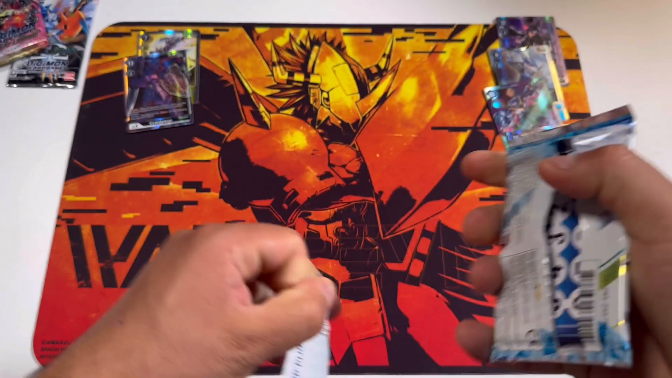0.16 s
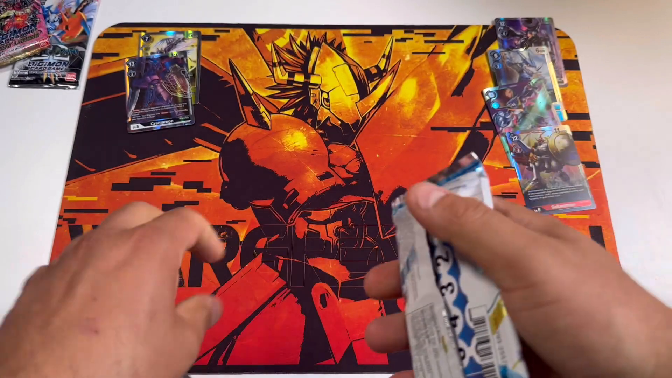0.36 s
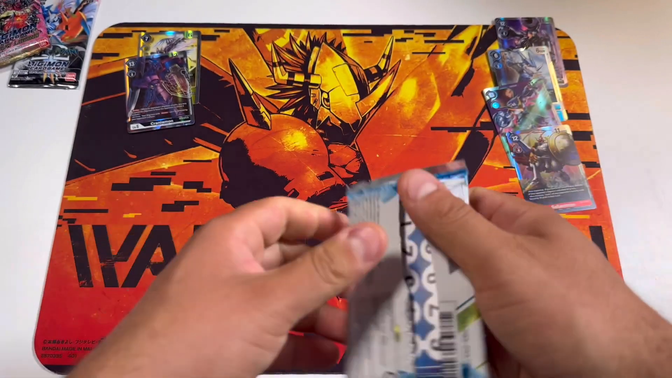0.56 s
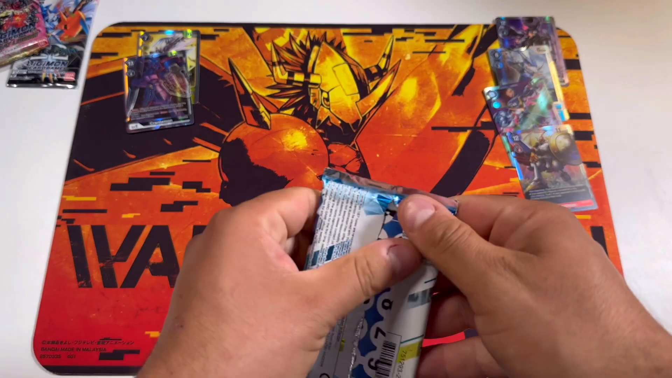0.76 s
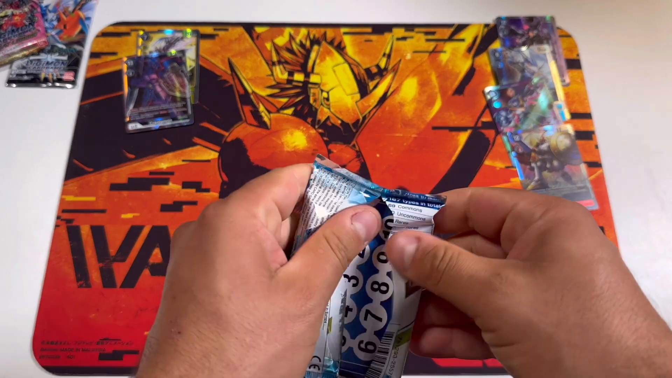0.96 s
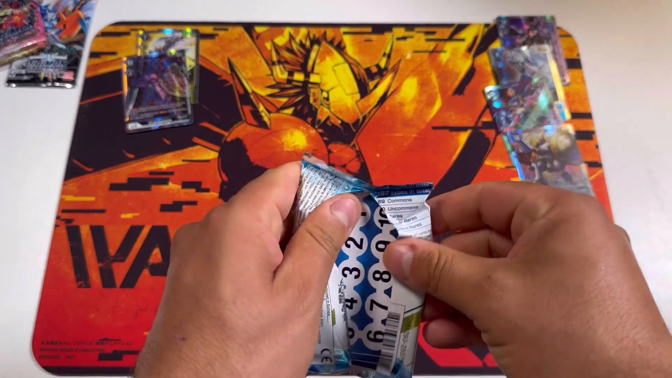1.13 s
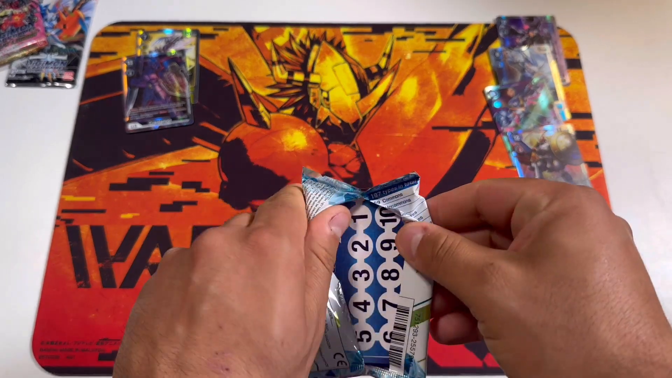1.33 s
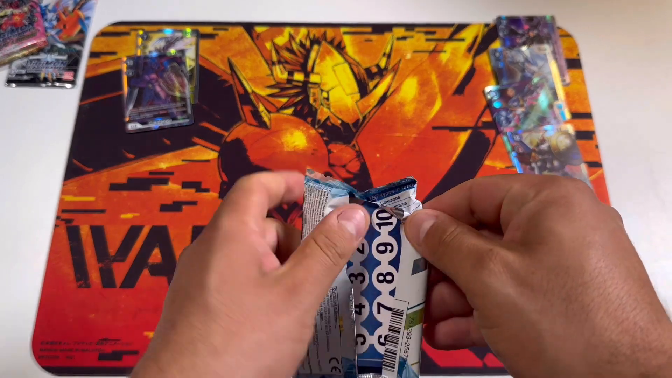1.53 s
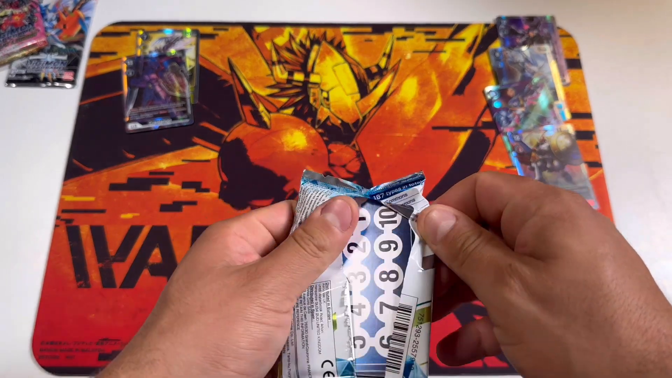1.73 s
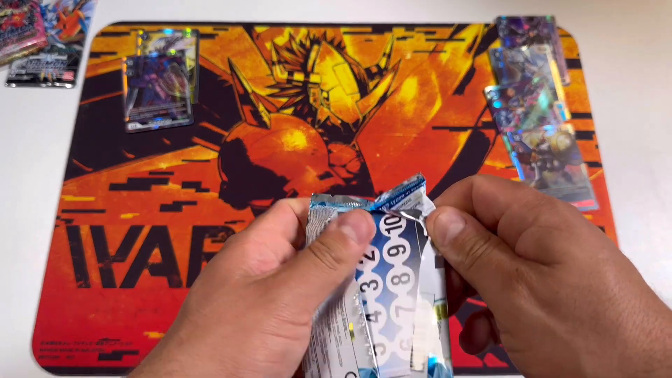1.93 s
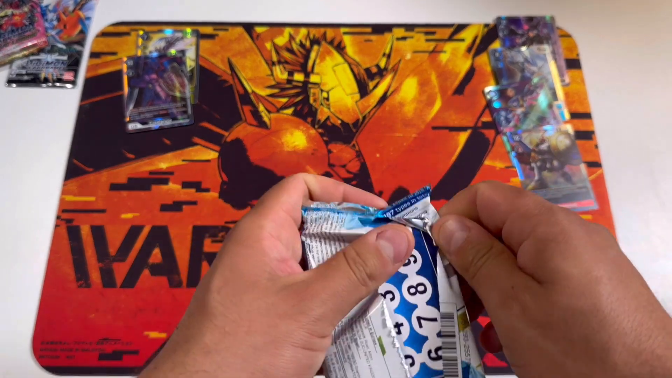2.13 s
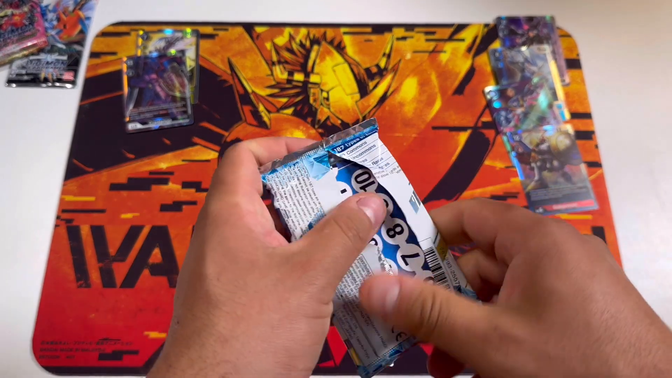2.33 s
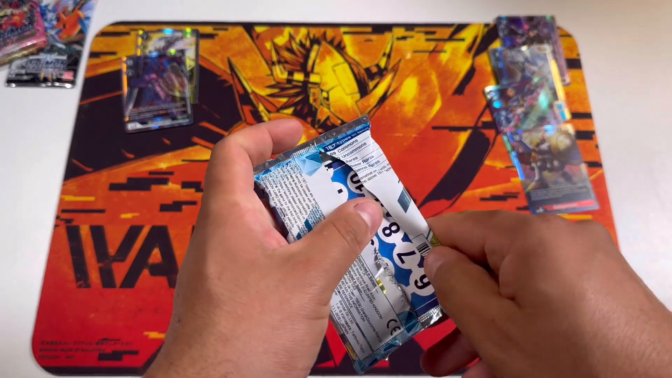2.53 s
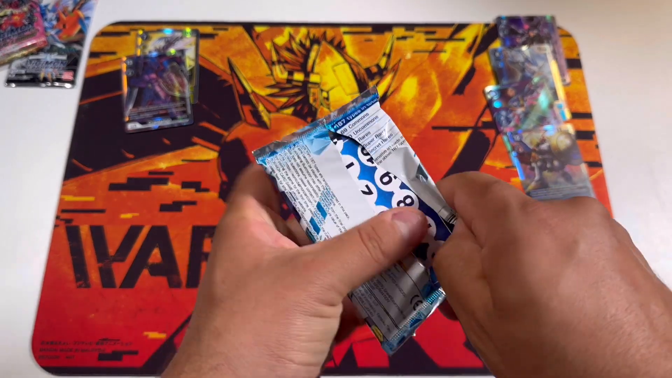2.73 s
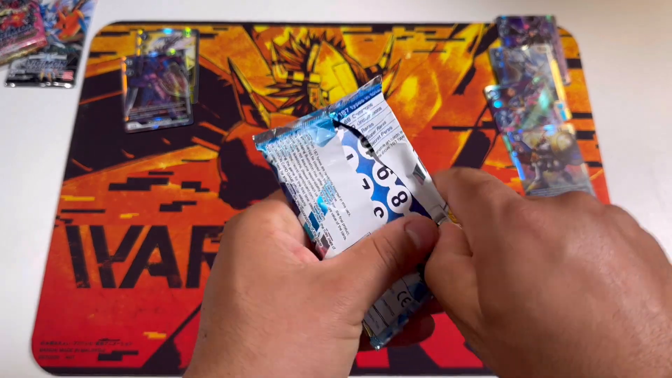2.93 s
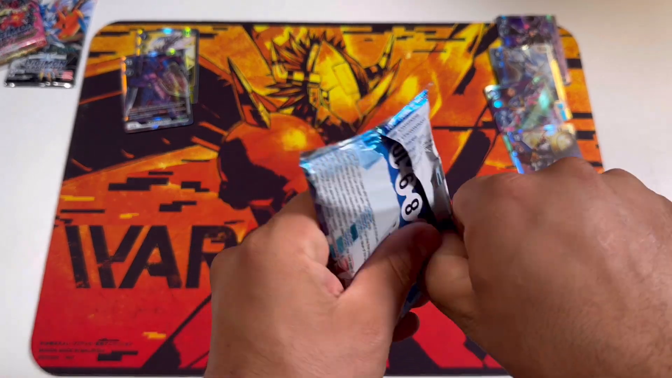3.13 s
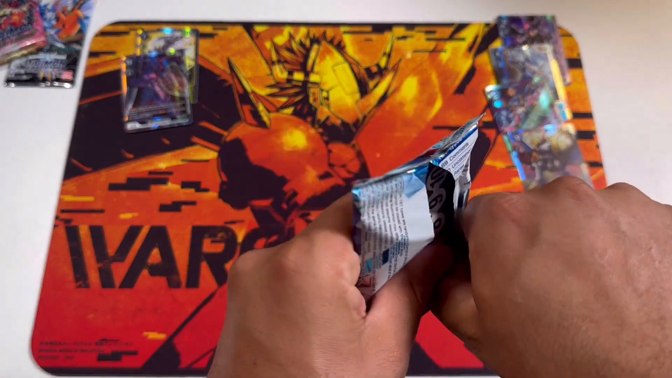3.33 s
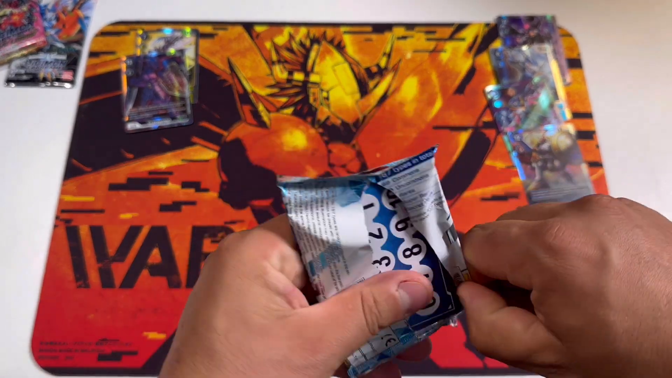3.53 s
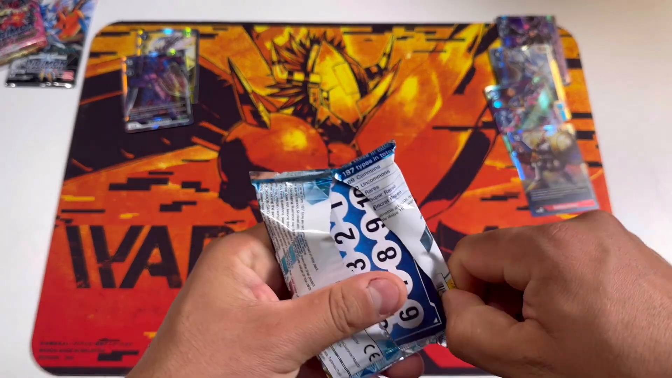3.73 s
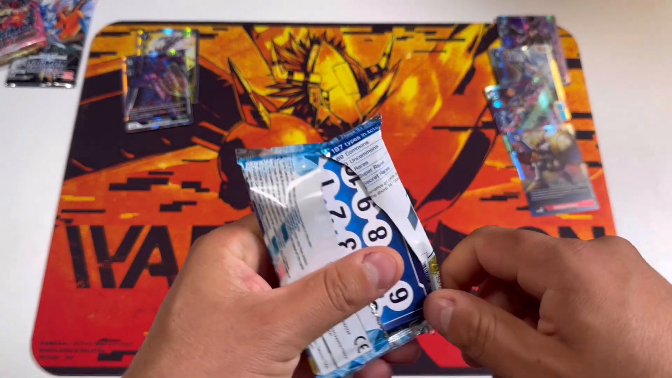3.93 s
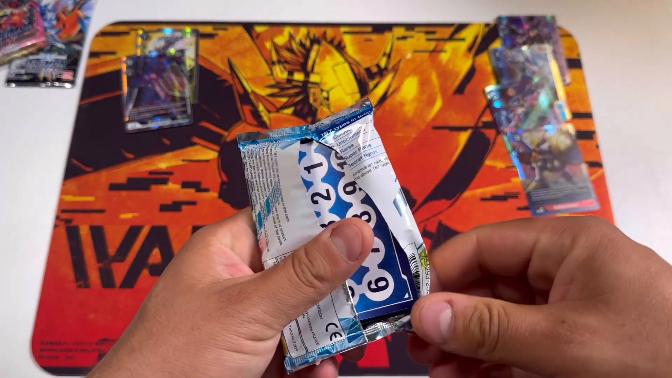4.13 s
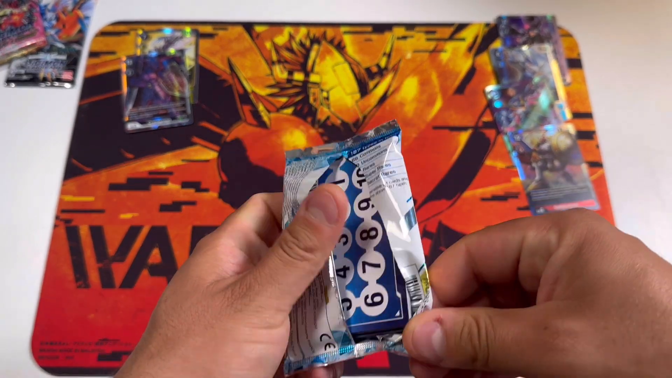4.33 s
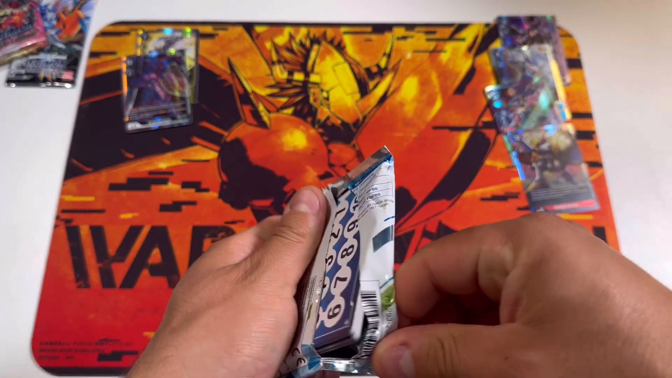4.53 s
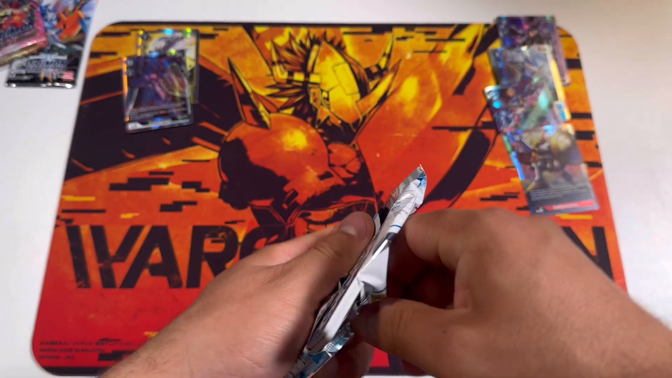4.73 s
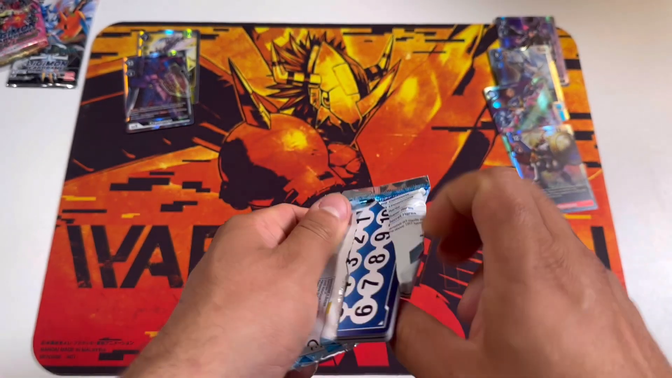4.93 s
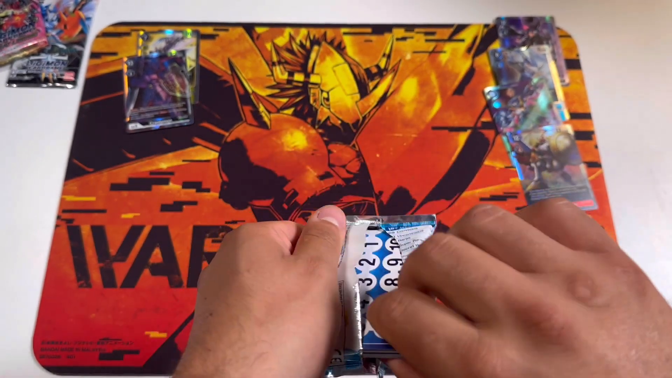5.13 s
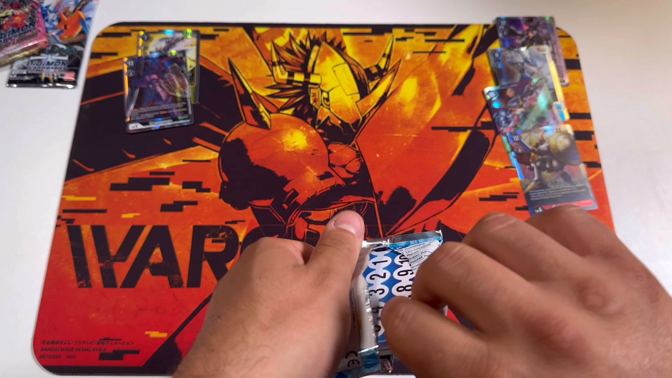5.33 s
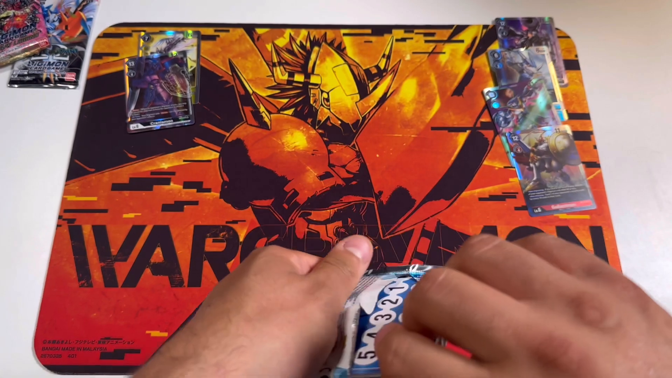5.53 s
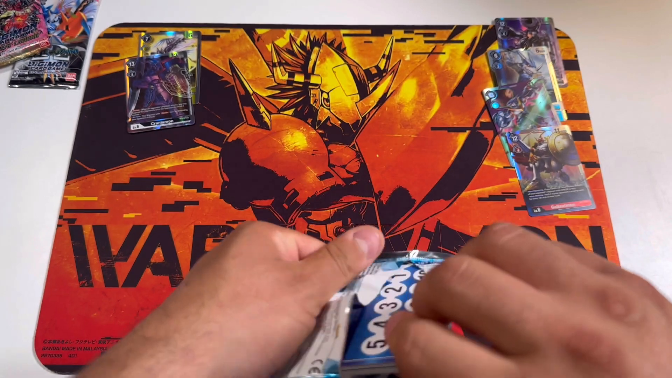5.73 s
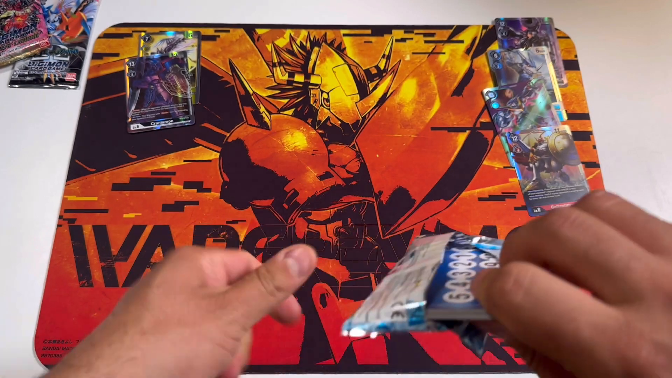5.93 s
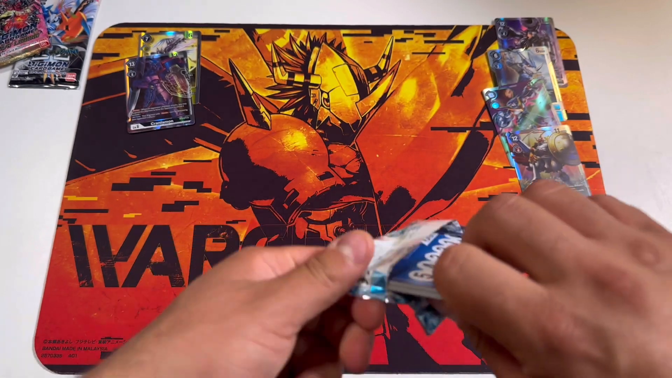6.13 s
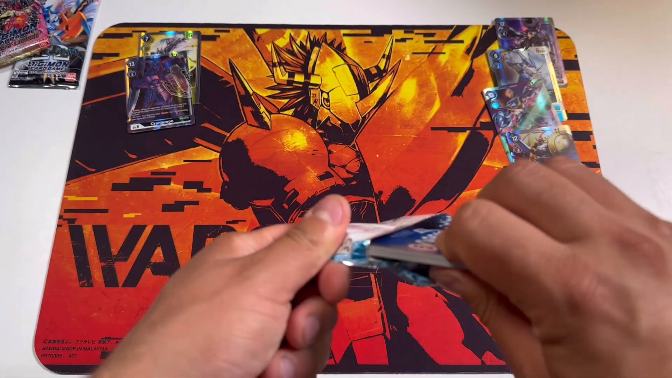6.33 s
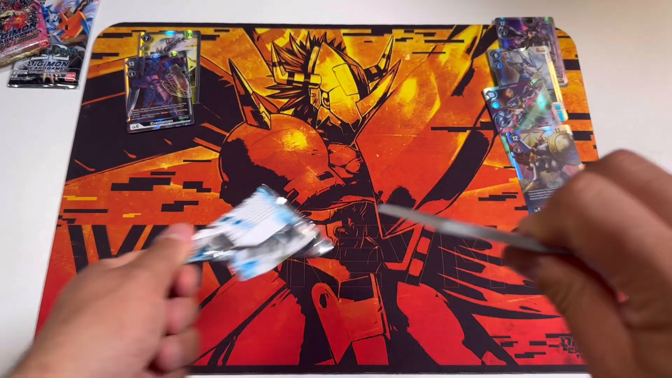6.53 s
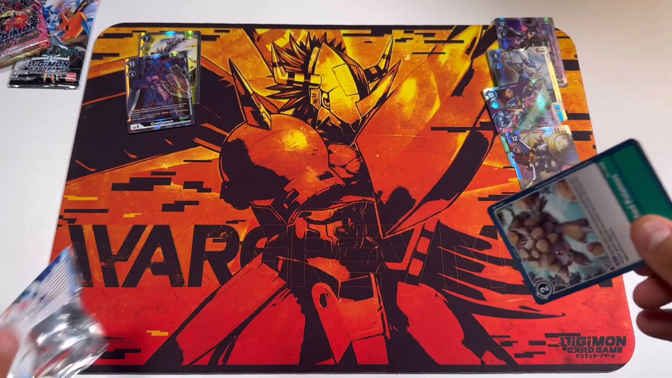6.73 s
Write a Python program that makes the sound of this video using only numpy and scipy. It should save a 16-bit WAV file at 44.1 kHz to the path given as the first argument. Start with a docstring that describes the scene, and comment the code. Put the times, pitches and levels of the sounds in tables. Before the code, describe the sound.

Two hands work a foil card packet very close to a stereo microphone in a small quiet room. Scattered crisp snaps and fine rustling come first, thicken into dense crackles around three and a half and four and a half seconds, then thin out. Short tears follow, and the wrapper is ripped away with a loud, thumping crackle near six and a half seconds, leaving near silence and one last snap.

```python
"""A small room, a two-port microphone close to two hands that open a foil card wrapper.
They crinkle it, rip its seam open and pull it off the cards. Creases snap one by one as chirping clicks;
foil tears or slides in dense runs of tiny crackles, and squeezes stir a fine rustle of wrinkles and foil.
Stretches of wrapper thump and plink as sinking tones; the hands rumble and brush as filtered noise.
Behind them lie the room's short diffuse tail and a bed of still air."""
import sys
import numpy as np
from scipy import signal
from scipy.fft import rfft, irfft
from scipy.io import wavfile
from scipy.ndimage import uniform_filter1d

SR = 44100
rng = np.random.default_rng(int(sys.argv[2]) if len(sys.argv) > 2 else 0)


def dump(signal):
    """Clip the signal to [-1, 1] and save it as 16-bit WAV at the path in sys.argv[1]."""
    limited = np.clip(np.atleast_2d(signal).T, -1, 1)
    pcm = np.round(limited * 32767).astype(np.int16)
    wavfile.write(sys.argv[1], SR, pcm)


N = 302614  # length in samples
TIME = np.arange(N) / SR  # s
TAPS = 1024  # samples in one click
HZ = np.fft.rfftfreq(TAPS, 1 / SR) + 1  # Hz, kept above zero

# Creases snapping close to the microphone:
# [t/s, level/dB, lowest f/Hz the facet radiates, ring f/Hz, brightness/(dB per octave)]
CREASE_SNAPS = [(0.032, -7, 620, 8600, -2), (0.0474, -11, 990, 10000, 4), (0.2324, -10, 260, 2230, 5),
                (0.4168, -10, 352, 1210, -2.5), (0.5631, -20, 330, 2080, -6.5), (0.6765, 3.5, 500, 6430, 1),
                (0.8168, -3.5, 427, 6250, 3.5), (0.8868, 8, 454, 5060, 1.5), (0.968, -8.5, 690, 3280, -0.5),
                (0.9811, -1.5, 714, 12100, -5.5), (1.089, -9.5, 370, 2930, 0.0), (1.1414, 1, 725, 2000, -1),
                (1.1535, -5, 610, 2600, -2.5), (1.204, 1, 890, 4350, -2.5), (1.255, -9.5, 1450, 3980, -8),
                (1.2908, -5.5, 1420, 5650, -3.5), (1.2947, -12, 770, 7800, 8.5), (1.3116, 5, 480, 3400, -3),
                (1.3276, -4, 770, 2360, -1.5), (1.4186, -9.5, 1750, 3240, -3.0),
                (1.4452, -20, 1430, 3300, -8.5), (1.468, -4, 480, 2810, -3.0),
                (1.4855, -10.5, 420, 1520, 1), (1.615, -15.5, 875, 3530, -1.5),
                (1.63, -9.5, 198, 1520, -0.5), (1.638, -6, 1450, 3430, -4.5), (1.7335, -11, 290, 4600, 7.5),
                (1.752, -11, 553, 4600, -2), (1.784, -12.5, 480, 8700, 2.5), (1.8265, -9.5, 423, 1900, 3),
                (1.8763, -7, 1800, 4500, -7), (1.8937, -7.5, 1250, 8600, -5.0),
                (1.9504, -5, 1420, 9500, -3.5), (1.9714, -5, 420, 1500, 1.5), (1.982, -9, 330, 1410, 2),
                (2.06, -14.0, 1420, 4500, -4.5), (2.09, -21.5, 1810, 4500, -7.5),
                (2.1035, -4, 1260, 10700, -2.0), (2.1361, -11.5, 665, 5000, -3),
                (2.2047, -11, 330, 1920, -0.5), (2.262, -17.0, 260, 2920, -2.5),
                (2.2793, -8.5, 1110, 3300, 0.5), (2.343, -10.5, 330, 3230, 1.5),
                (2.3478, -10, 200, 4380, 6.5), (2.5365, -20.5, 1000, 7000, 0.5),
                (2.5579, -8, 610, 5570, 4.5), (2.616, 1.5, 806, 3200, -1.0), (2.6622, -11, 1270, 2900, 0.0),
                (2.685, -10, 750, 3340, 0), (2.8323, -10.5, 1110, 3220, -2), (2.844, -9.5, 257, 3360, 2.5),
                (2.877, 0.5, 555, 2550, -3), (2.8905, -7.5, 370, 2620, 0.5), (2.9338, -1, 710, 2620, 1),
                (2.9755, -18.5, 200, 1400, -2.0), (3.0045, -15, 2300, 3680, -6),
                (3.1198, -9, 1430, 3260, -1.5), (3.1347, -11, 990, 4080, 0.5), (3.152, -10, 990, 1900, 4.5),
                (3.1864, -5.5, 870, 2520, 1), (3.2041, -14, 260, 4500, 3),
                (3.2104, -12.5, 547, 14900, -0.5), (3.3176, -12.5, 2600, 8750, -1.5),
                (3.3462, -3, 2320, 14700, -1.5), (3.378, -0.5, 1310, 7800, -4.5),
                (3.3922, -5, 1020, 10750, -4), (3.3984, -3, 1260, 1920, -2), (3.448, -2.0, 540, 1400, 8.0),
                (3.4863, -7.5, 970, 1200, -3), (3.5066, 3, 870, 1090, 5), (3.5176, 3, 950, 10900, -3.5),
                (3.528, -5.5, 610, 11500, 8), (3.5436, -16, 870, 8600, 6), (3.555, -2.5, 770, 9600, 2.5),
                (3.5585, -2, 775, 4100, -2.5), (3.6284, -5.5, 615, 5630, -1), (3.6421, -2, 770, 8640, 4.5),
                (3.69, -13, 332, 1190, -1.5), (3.7173, -8, 1100, 15000, -3.0),
                (3.7402, -13.5, 543, 2360, -2), (3.83, -2.5, 765, 4600, 3.5),
                (3.8519, -0.5, 230, 6900, -3.5), (3.8659, -6.5, 610, 14800, -1.5),
                (3.892, -6, 420, 5600, -3.5), (3.9178, 4.5, 330, 1380, 5.0), (3.9983, 4.5, 230, 3240, -0.5),
                (4.0537, -15, 290, 2100, -4.5), (4.0832, -13.0, 610, 4650, -5),
                (4.1285, -14, 870, 8900, -1.5), (4.16, -25, 230, 13300, -5.5),
                (4.2317, -7.5, 330, 2430, 0.5), (4.2447, -6.5, 690, 3670, 1.5),
                (4.2942, -15.5, 476, 2970, -5.0), (4.375, -4.5, 230, 6900, -0.5),
                (4.3993, -13.5, 370, 1230, -3.5), (4.413, -10.5, 330, 1200, 9), (4.4379, -4, 372, 760, 0),
                (4.444, -5, 540, 800, 1.5), (4.4798, -18, 260, 1100, 7), (4.4956, -11.5, 420, 4020, 2.5),
                (4.5093, -8.5, 370, 8500, -4), (4.5838, -8, 230, 4500, -1.5), (4.5982, -6.5, 480, 10700, 0),
                (4.6156, 6.0, 483, 1840, 3.5), (4.6254, 6, 380, 4100, -1.0), (4.678, 1.5, 292, 7900, 4.5),
                (4.689, -8, 870, 2840, -2.0), (4.7066, -7.5, 770, 2400, 5), (4.748, -12.5, 990, 5000, 6),
                (4.7824, -21, 990, 2620, -0.5), (4.8, -14.5, 1260, 4499, 0.5), (4.8168, -10, 1110, 9500, 7),
                (4.852, -14, 880, 2400, 6.5), (4.8795, -11.5, 230, 2040, -1),
                (5.0216, -17, 1260, 1480, 6.0), (5.0479, -13, 480, 1990, 0),
                (5.0616, -13.5, 480, 3200, 5.5), (5.1187, -11, 680, 2100, 2.5),
                (5.1299, -9, 420, 2100, -0.5), (5.1664, -6, 610, 2090, 0), (5.2314, -26.5, 610, 1900, 12),
                (5.2851, -19.5, 1140, 2820, -3.0), (5.379, -13.5, 420, 7700, 5.5),
                (5.41, -11.5, 425, 1410, -0.5), (5.4276, -3.5, 2020, 5700, -10),
                (5.4364, 2, 2300, 14400, -5.5), (5.566, -11, 1220, 7700, -8.0),
                (5.583, -7.5, 955, 1930, -1), (5.6214, -24, 420, 3300, 10.5),
                (5.6408, -7.5, 1420, 13300, -1), (5.6572, -6, 690, 2900, 0.5), (5.68, -3.5, 477, 2400, 2),
                (5.7336, 3, 870, 2570, -0.5), (5.759, -2, 261, 10700, 1), (5.77, 8.0, 294, 800, 1.5),
                (5.989, -37, 420, 4500, 0.5), (6.0971, -5.5, 230, 1105, -1.0),
                (6.1239, -12.5, 610, 8800, 3.5), (6.2185, -7.5, 375, 1700, 2.5),
                (6.2885, -1, 287, 14600, 0.5), (6.3448, -2.5, 230, 1180, 3.5), (6.3933, -15, 420, 900, -5),
                (6.4191, 7, 334, 3800, 3.5), (6.4524, 10.5, 260, 1870, -2.5), (6.4653, 7.5, 260, 3540, 1.5),
                (6.486, 9, 326, 750, 0.0), (6.675, -30, 260, 3400, 4.5), (6.7721, -19.5, 330, 5700, 0.5),
                (6.7862, 2.0, 260, 7060, 0)]


def snaps(level_db=0, long_crease_hz=260, room_db=-9, softer_room_per_db=0.4):
    """Large creases buckle, longer the lower they reach; returns the near sound and the room's share."""
    near, sent = np.zeros((2, 2, N))
    for s, db, low_hz, ring_hz, bright_db in CREASE_SNAPS:
        start = s - TAPS / 4 / SR  # a click is centred a quarter into its frame
        snap_db = level_db + db
        colour_db = snap_db + facet_db(low_hz, ring_hz, bright_db, ring_db=10.5)
        slips = min(long_crease_hz / low_hz, 1) ** 1.5
        add(near, start, click(colour_db, slips=slips, ripple=.6))
        # the room gathers sound from all sides of the facet: smoother colour, less varied level
        all_round_db = snap_db + facet_db(low_hz, ring_hz, bright_db, ring_db=5.5)
        room_gain = gain_of(room_db - softer_room_per_db * db)
        add(sent, start, room_gain * click(all_round_db, ripple=0))
    return near, sent


# Spectrum common to all foil facets: [f/Hz, level/dB]
FOIL_SPECTRUM = [(300, -3), (600, -6), (1300, -5.5), (1750, -4), (2300, -6), (3700, -2.5), (4800, -4),
                 (6500, -6.5), (8000, -7), (9400, 3.5), (11000, -12.5), (12200, -12), (14500, -8),
                 (16000, -11)]


def facet_db(low_hz, ring_hz, bright_db, ring_db, ring_octaves=.26):
    """Spectrum of one foil facet: too small to radiate bass, with one broad resonance."""
    bass_cut = -10 * np.log10(1 + (low_hz / HZ) ** 8)
    octaves = np.clip(np.log2(HZ / 4000), -1.5, 2)
    ring = ring_db / (1 + (np.log2(HZ / ring_hz) / ring_octaves) ** 2)
    return read(FOIL_SPECTRUM, HZ) + bass_cut + bright_db * octaves + ring


# The two microphone ports, before each click's scatter: [f/Hz, phase by which the left leads/rad]
PORT_LEAD = [(700, 0), (1200, .1), (2300, .7), (3500, 1.35), (5500, 1.2), (8000, 1.8), (9500, 1.6),
             (13000, 1.3), (16000, 2)]


def click(colour_db, slips=0, ripple=1.0, spread_s=0.00156, slip_s=0.001183,
          echo_db=-7, echo_s=0.0037, left_db=2, scatter_db=1, turn=0.2):
    """One buckle; bending waves carry the treble out first, so it chirps down."""
    travel, pan, angle = rng.standard_normal(3)
    amplitude = gain_of(colour_db)
    power = amplitude ** 2
    delay = spread_s * np.exp(0.2025 * travel) / np.sqrt(np.maximum(HZ, 400) / 1000)
    # centre the strongest part a quarter into the frame
    delay += TAPS / 4 / SR - np.average(delay, weights=power ** 2)
    turns = np.cumsum(delay) * SR / TAPS + rng.random()
    direct = amplitude * np.exp(-2j * np.pi * turns)

    # a long crease gives way in several slips around the main one
    when, phase = 2 * rng.random((2, 6, 1)) - 1
    run = 1 + slips * np.exp(1j * np.pi * (phase - 2 * HZ * slip_s * when)).sum(0)

    # the wave bounces between the folds of the pouch for a few milliseconds
    t = np.arange(TAPS) / SR
    bounce = np.exp(-t / echo_s) * (1 - np.exp(-t / 0.001))
    shared, left, right = rng.standard_normal((3, TAPS)) * bounce
    folds = shared + .4 * np.array([left, right])
    echoes = rfft(folds / np.linalg.norm(folds[0]))
    paths = run * (1 + gain_of(echo_db) * echoes)

    # ripple (0-1) is how deeply these paths comb the spectrum
    sound = direct * paths * (abs(paths) + .15) ** (np.clip(ripple, 0, 1) - 1)
    sound *= np.sqrt(power.mean() / np.mean(abs(sound) ** 2))
    side = np.array([[.5], [-.5]])
    balance = gain_of(side * (left_db + scatter_db * pan))
    lead = np.exp(1j * side * read(PORT_LEAD, HZ) * (1 + turn * angle))
    return irfft(sound * balance * lead, TAPS)


# Runs of tearing or sliding foil, close by:
# [start t/s, end t/s, level/dB, lowest f/Hz, brightness/(dB per octave)]
TEARS_AND_SLIDES = [(0.23, 0.252, -45, 900, 3), (2.11, 2.137, -50, 1200, 2.5),
                    (2.446, 2.466, -44.5, 1490, -0.5), (3.346, 3.4, -39, 1220, 1.5),
                    (3.504, 3.527, -34, 820, 0), (3.79, 3.828, -41.5, 680, -1.5),
                    (3.992, 4.003, -32.5, 400, -0.5), (4.631, 4.671, -29, 690, 1.5),
                    (5.436, 5.478, -35.5, 1300, 1.5), (5.658, 5.699, -38, 800, -0.5),
                    (5.746, 5.79, -37.5, 400, -2.5), (6.229, 6.338, -29, 494, 5),
                    (6.42, 6.506, -31, 333, -1), (6.78, 6.82, -39, 200, -2.5)]


def tears_and_slides(edge_s=0.0011):
    """Foil tears or slides in dense runs of tiny crackles, starting and stopping sharply."""
    out = np.zeros((2, N))
    for start, end, db, low_hz, bright_db in TEARS_AND_SLIDES:
        run = grains(size=8192, per_s=1600, spread_db=-0.5, low_hz=low_hz, bright_db=bright_db, ring_db=8)
        t = np.arange(run.shape[1]) / SR
        edges = np.clip(np.minimum(t, end - start - t) / edge_s, 0, 1)
        add(out, start, gain_of(db) * run * edges)
    return out


def grains(size, per_s, spread_db, low_hz, bright_db, ring_db, count=20):
    """A random run of tiny buckles from many facets, rms 1."""
    sizes_db = spread_db * np.minimum(rng.exponential(1, size), 3.5)
    strength = gain_of(sizes_db) * (rng.random(size) < per_s / SR)
    facet = rng.integers(0, count, size)
    shapes = []
    for ring_hz in np.geomspace(1400, 12000, count):
        colour_db = facet_db(low_hz * rng.uniform(0.57, 1.57), ring_hz, bright_db, ring_db)
        shapes.append(click(colour_db, slips=0.18))
    out = np.zeros((2, size + TAPS))
    for at in np.flatnonzero(strength):
        out[:, at:at + TAPS] += strength[at] * shapes[facet[at]]
    return evened(out[:, TAPS // 4:][:, :size])


# Separate squeezes and pulls of the fingers on the foil: [start t/s, length/s, relative level/dB]
FINGER_SQUEEZES = [(-.02, 0.24, -55), (0.274, .08, -65), (0.477, 0.14, -56.5), (0.689, 0.088, -54.5),
                   (0.91, 0.16, -54), (1.13, .24, -61), (1.424, 0.12, -49), (1.767, 0.18, -66),
                   (2.142, .19, -52.5), (2.415, 0.052, -52.5), (2.58, 0.22, -56), (2.858, 0.18, -57.5),
                   (3.123, 0.061, -79), (3.327, 0.15, -50.5), (3.692, 0.058, -52), (3.767, .1, -53),
                   (3.976, 0.18, -59), (4.274, 0.61, -52), (4.756, 0.22, -68.5), (4.962, 0.084, -62),
                   (5.027, 0.18, -55), (5.3, 0.22, -65), (5.557, 0.25, -47.5), (6.102, 0.12, -60),
                   (6.226, 0.15, -55), (6.654, 0.089, -70)]


def rustle(level_db=0, wrinkle_db=-1, slide_db=-11.5, held_db=-76):
    """Small wrinkles shift under the fingers and around snaps, over the smoother hiss of foil on card."""
    wrinkles = grains(N, per_s=220, spread_db=4.4, low_hz=900, bright_db=-2.5, ring_db=13)
    slide = grains(N, per_s=2100, spread_db=1.5, low_hz=960, bright_db=-2.0, ring_db=6.0)
    squeeze = moves(FINGER_SQUEEZES) + gain_of(held_db)
    stirred = np.hypot(squeeze, around_snaps())
    fine = gain_of(wrinkle_db) * stirred * wrinkles
    hiss = gain_of(slide_db) * squeeze * slide
    return gain_of(level_db) * (fine + hiss)


# wrinkle level after a 0 dB snap (dB), dB more per dB of snap, and settling time (s)
SETTLE_DB, SETTLE_PER_DB, SETTLE_S = -47, 1.3, 0.012
FADE_IN_DB, FADE_IN_S = -3, 0.013  # rustle heard before a snap: dB relative to the settling, time in s


def around_snaps():
    """Level over time of wrinkles that settle in the wake of each snap, with a short fade-in before it."""
    kicks = np.zeros(N)
    for s, db, *_ in CREASE_SNAPS:
        kicks[round(s * SR)] += gain_of(SETTLE_DB + SETTLE_PER_DB * db) ** 2
    after = signal.lfilter([1], [1, -np.exp(-2 / SETTLE_S / SR)], kicks)
    # a similar decay run backwards in time makes the fade-in
    before = signal.lfilter([1], [1, -np.exp(-2 / FADE_IN_S / SR)], kicks[::-1])[::-1]
    return np.sqrt(after + gain_of(FADE_IN_DB) ** 2 * before)


def pouch(x, hollow_hz=1830, width_hz=330):
    """The hollow of the wrapper resonates and colours the rustle with a papery ring."""
    return signal.lfilter(*signal.iirpeak(hollow_hz, hollow_hz / width_hz, fs=SR), x)


# The pouch and the cards in it flexing: [t/s, level/dB, middle pitch f/Hz]
POUCH_THUMPS = [(.89, -43, 252), (1.312, -39.5, 544), (1.638, -51, 307), (3.856, -33, 285), (3.9, -42, 268),
                (3.998, -42, 237), (4.38, -46.5, 117), (4.66, -42, 298), (5.772, -37.5, 189),
                (5.794, -46, 122), (6.099, -45, 246), (6.29, -49, 423), (2.879, -44, 750),
                (6.422, -30.5, 493), (6.452, -22.5, 810), (6.486, -26, 700), (6.466, -34, 93),
                (6.488, -38, 129), (6.498, -46, 70), (6.784, -39, 220), (6.81, -54, 100)]


def thumps():
    """The pouch thumps in a very few cycles of a sinking tone."""
    return flexes(POUCH_THUMPS, cycles=0.84, sag=0.29)


# Taut panels of the wrapper plinking: [t/s, level/dB, middle pitch f/Hz]
PANEL_PLINKS = [(.51, -32, 1520), (.565, -57, 2150), (.715, -48, 1300), (1.827, -41, 1770),
                (2.205, -40, 2000), (2.304, -37, 2110), (4.866, -45, 2050), (5.314, -42, 2020),
                (5.344, -46, 2090), (5.465, -31.5, 1480), (5.583, -32, 1760), (5.611, -43, 1170),
                (5.72, -43, 1200)]


def plinks():
    """Taut panels ring for several cycles of a sinking tone."""
    return flexes(PANEL_PLINKS, cycles=4.6, sag=0.17)


def flexes(rows, cycles, sag):
    """A stretch of the wrapper pops as a whole: a short tone that swells, dies and sinks in pitch."""
    out, t = np.zeros((2, N)), np.arange(4096) / SR
    for s, db, hz in rows:
        age = t * hz / cycles
        pitch = hz * (1 + sag * (2 * np.exp(-age) - 1))
        turns = np.cumsum(pitch) / SR
        swell = 2 * age * np.exp(1 - 2 * age)
        balance = gain_of(db + np.array([[1], [-1]]))  # a little louder on the left
        add(out, s - .002, balance * swell * np.sin(2 * np.pi * turns))
    return out


# How firmly the hands grip the pack: [t/s, dull rumble relative level/dB, skin brushing relative level/dB]
GRIP = [(0.0, -69.5, -64.5), (0.95, -66.5, -62.5), (1.2, -75, -64.5), (1.95, -81.5, -77.5),
        (2.21, -72, -68.5), (2.43, -79, -74.5), (2.98, -80, -77), (3.42, -78, -78.5), (3.59, -76, -74),
        (4.47, -66.5, -62), (5.18, -83, -81), (5.44, -82, -79), (5.75, -87, -65.5), (5.9, -78, -79),
        (6.08, -68.5, -77), (6.36, -78, -67), (6.63, -82, -74), (6.86, -73, -88.5)]
# Short swells of low rumble as the pouch puffs air out: [t/s, length/s, relative level/dB]
RUMBLE_SWELLS = [(1.98, 0.043, -76), (2.32, .06, -72), (2.6, 0.1, -69), (2.85, 0.044, -62),
                 (2.93, .09, -76), (4.35, 0.03, -62), (5.1, 0.028, -63), (5.76, .04, -64),
                 (6.44, 0.071, -44), (6.78, 0.061, -51)]
# Spectrum of the hands' rumble: [f/Hz, level/(dB per Hz)]
RUMBLE_SPECTRUM = [(20, -51.5), (33, -20.5), (52, -0.5), (90, -2.5), (150, -4), (250, -16.5), (600, -34)]
# Spectrum of skin brushing the pack: [f/Hz, level/(dB per Hz)]
SKIN_SPECTRUM = [(60, -15), (150, -6.5), (260, 2), (430, 0.5), (700, -7.5), (1500, -8), (4000, -29.5),
                 (12000, -18.5)]
SQUEEZE_LIFTS_DB = 4  # the hands are louder while they squeeze


def hands(rumble_db=-1, brush_db=-1, swell_brush_db=-3):
    """Shifting grip gives a dull rumble and skin brushes the pack, both in uneven little drags."""
    s, rumble, brush = np.transpose(GRIP)
    wander = uniform_filter1d(uniform_filter1d(rng.standard_normal(N), 1500), 900)
    drag_db = 2.2 * evened(wander)
    squeezing = sum(stroke(start, length) for start, length, _ in FINGER_SQUEEZES)
    effort_db = SQUEEZE_LIFTS_DB * np.minimum(squeezing, 1)
    swells = moves(RUMBLE_SWELLS)
    rumble_gain = gain_of(rumble_db + effort_db + np.interp(TIME, s, rumble)) + swells
    brush_gain = gain_of(brush_db + effort_db + np.interp(TIME, s, brush))
    brush_gain = brush_gain + gain_of(swell_brush_db) * swells  # the skin is heard in the swells too
    low = rumble_gain * noise(RUMBLE_SPECTRUM, apart=0.14)
    soft = brush_gain * noise(SKIN_SPECTRUM, apart=0.47)
    return (low + soft) * gain_of(drag_db + np.array([[.8], [-.8]]))


SQUEEZE_RISE_S, SQUEEZE_FALL_S = 0.015, 0.014  # every squeeze and swell builds, holds and lets go alike


def stroke(start, length):
    """Envelope of one squeeze or swell: rise, hold, release."""
    age = TIME - start
    rise = np.clip(age / SQUEEZE_RISE_S, 0, 1)
    return rise * np.exp(-np.clip((age - length) / SQUEEZE_FALL_S, 0, 40))


def moves(rows):
    """Level over time of a series of squeezes or swells."""
    return sum(gain_of(db) * stroke(start, length) for start, length, db in rows)


# How long the small room rings: [f/Hz, t60/s]
ROOM_DECAY = [(200, 0.29), (1000, 0.245), (4000, 0.2458), (9000, 0.3), (16000, 0.18)]
# Colour of the room's tail: [f/Hz, level/dB]
ROOM_TONE = [(200, 3), (600, 0.5), (2000, 0.5), (5000, 2), (9500, -5), (15000, -9)]


def room(x, build_s=0.00046, alike_hz=1500):
    """Sparse random echoes make a short diffuse tail, its bass nearly the same at both ports."""
    size = 22050
    taps = rng.standard_normal((2, size)) * (rng.random((2, size)) < .15)
    hz, t, z = signal.stft(taps, SR, nperseg=256)
    alike = (1 / (1 + (hz / alike_hz) ** 2))[:, None]
    z[1] = alike * z[0] + np.sqrt(1 - alike ** 2) * z[1]
    decay = gain_of(-60 * t / read(ROOM_DECAY, hz)[:, None])
    tail = signal.istft(z * decay, SR, nperseg=256)[1][:, :size]
    tail *= 1 - np.exp(-np.arange(size) / SR / build_s)
    tail /= np.linalg.norm(tail, axis=1, keepdims=True)
    tone = gain_of(read(ROOM_TONE, np.fft.rfftfreq(size, 1 / SR)))
    tail = irfft(rfft(tail) * tone)
    fade = signal.windows.hann(2 * size)[size:]
    return signal.fftconvolve(x, tail * fade, axes=1)[:, :N]


# Spectrum of the still air: [f/Hz, level/(dB per Hz)]
AIR_SPECTRUM = [(18, -24.5), (30, -12), (157, -12), (194, -5.5), (233, -16), (740, -42.5), (4530, -27),
                (8080, -44.5), (9460, -26.5), (16000, -49)]
AIR_DB = -82  # rms level


def air():
    """The still air of the room: steady, faint coloured noise."""
    return gain_of(AIR_DB) * noise(AIR_SPECTRUM, apart=0.34)


def noise(spectrum, apart):
    """Stereo noise of a given colour, rms 1; apart is the amount that differs between the ports."""
    colour = gain_of(read(spectrum, np.fft.rfftfreq(N, 1 / SR)))
    mid, side = irfft(rfft(rng.standard_normal((2, N))) * colour, N)
    return evened(np.array([mid + apart * side, mid - apart * side]))


def gain_of(db):
    """Decibels to amplitude."""
    return 10 ** (np.asarray(db) / 20)


def evened(x):
    """Scales to rms 1."""
    return x / np.sqrt(np.mean(x ** 2) + 1e-20)


def read(points, hz):
    """Reads a table on a log-frequency axis."""
    f, value = np.transpose(points)
    return np.interp(np.log(hz + 1), np.log(f + 1), value)


def add(mix, s, sound):
    """Mixes a stereo sound in at time s, or at the very start if s is negative."""
    part = mix[:, max(round(s * SR), 0):][:, :sound.shape[1]]
    part += sound[:, :part.shape[1]]


def scene(crackle_room_db=-8, thump_room_db=-8, hollow_db=-4):
    """Foil, pouch and hands, with the room's answer and its still air."""
    near, sent = snaps()
    fine = rustle()
    crackle = fine + gain_of(hollow_db) * pouch(fine) + tears_and_slides()
    pops = thumps() + plinks()
    tail = room(sent + gain_of(crackle_room_db) * crackle + gain_of(thump_room_db) * pops)
    return near + crackle + pops + hands() + tail + air()


EDGE_HZ = 16100  # top of the recorder's band


def record(dry):
    """The recorder's band limit: a steep linear-phase low-pass."""
    lowpass = signal.firwin(255, EDGE_HZ, window=("kaiser", 9), fs=SR)
    return signal.oaconvolve(dry, lowpass[None], "same")


dry = scene()
out = record(dry)
dump(out)
```